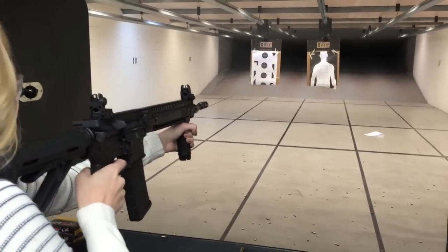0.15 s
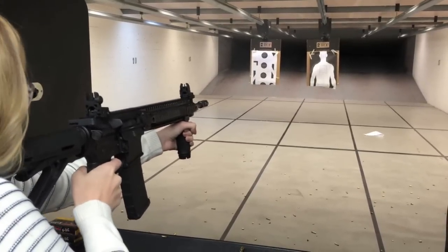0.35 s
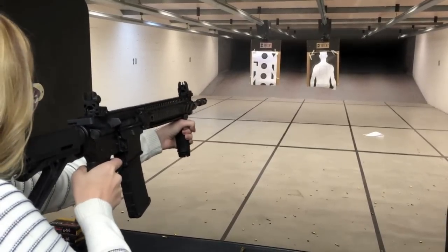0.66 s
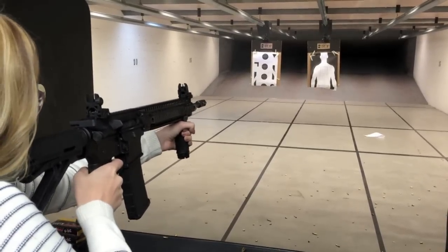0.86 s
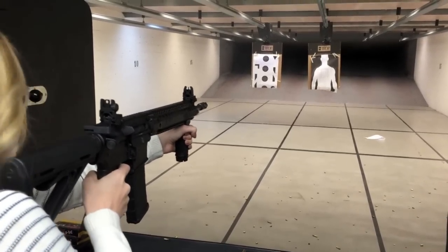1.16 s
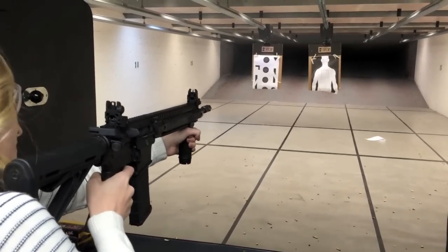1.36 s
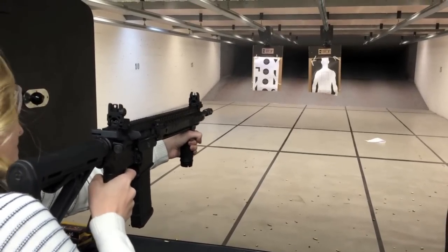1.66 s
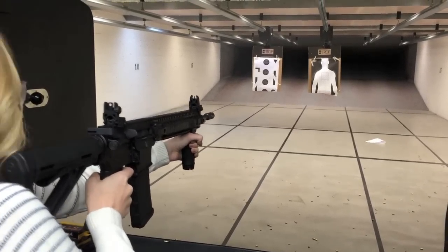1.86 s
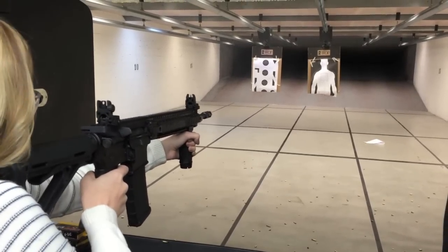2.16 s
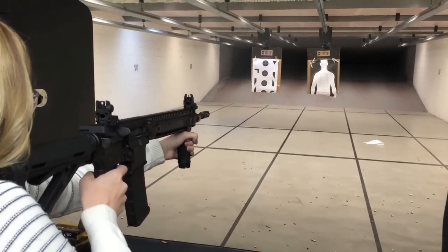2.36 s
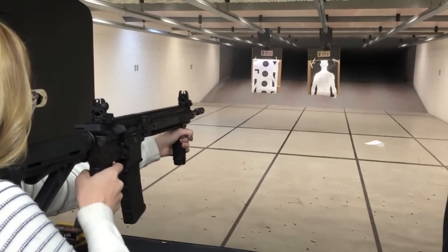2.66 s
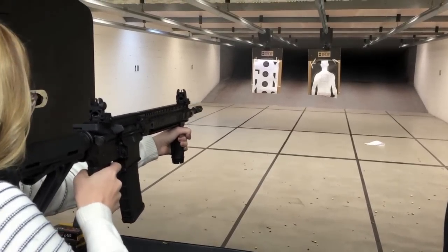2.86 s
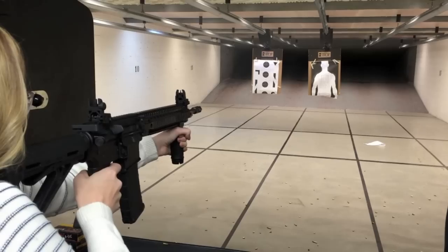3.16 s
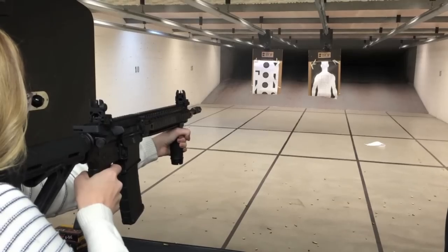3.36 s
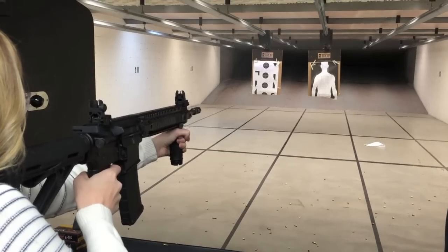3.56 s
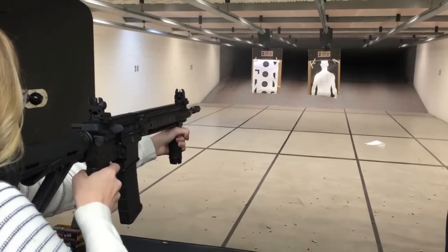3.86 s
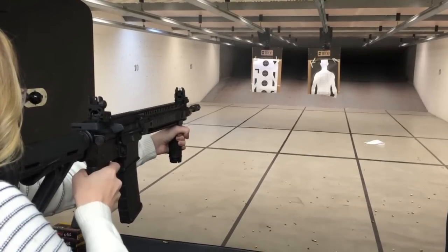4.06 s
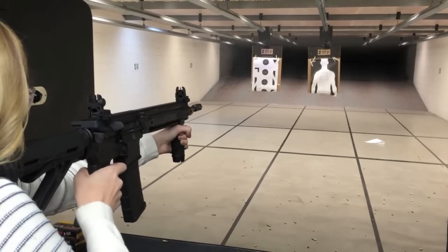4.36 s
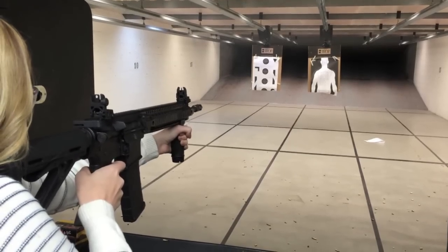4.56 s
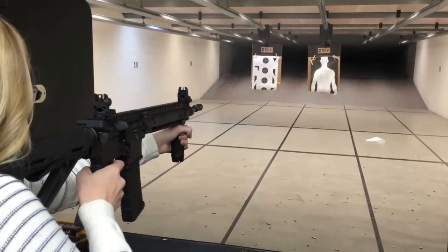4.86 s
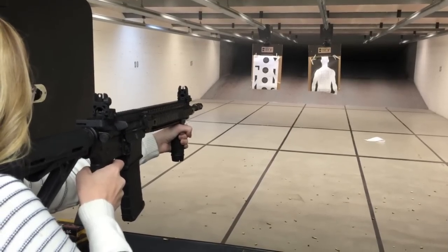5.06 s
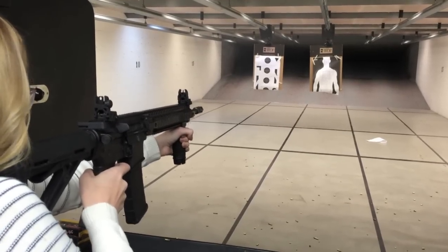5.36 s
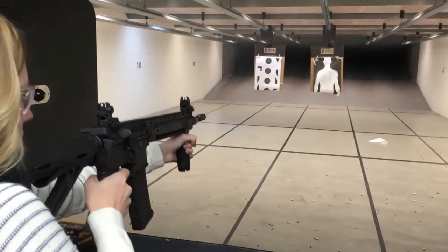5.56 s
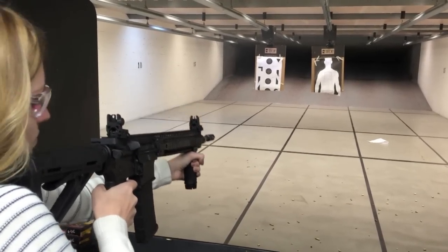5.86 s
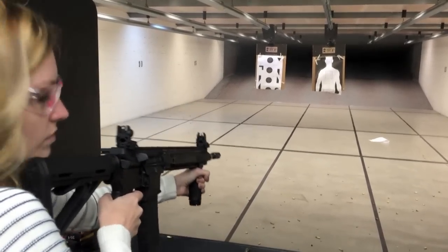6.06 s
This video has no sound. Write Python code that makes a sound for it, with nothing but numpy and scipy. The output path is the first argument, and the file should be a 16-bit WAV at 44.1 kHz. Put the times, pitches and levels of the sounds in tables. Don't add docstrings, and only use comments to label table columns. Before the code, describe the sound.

Indoor shooting range, microphone near the rifle. Low throbbing ducts and smooth vent hiss run throughout. One loud shot comes almost at once and rolls down the hall for seconds; hard bright metal clacks break its fading tail. Another shot cracks, preceded by a tiny click, and its empty case hits the floor on its rim, rings thinly and slaps flat. A faint metal tick ends it. Peaks are limited and flattened.

```python
import sys
import numpy as np
from scipy import signal
from scipy.fft import rfft, irfft
from scipy.io import wavfile
from scipy.ndimage import uniform_filter1d, minimum_filter1d

SR = 44100
rng = np.random.default_rng(int(sys.argv[2]) if len(sys.argv) > 2 else 0)


def ratio_of_db(decibels):
    return 10 ** (np.asarray(decibels, float) / 20)


def master(y):
    cut = np.clip(np.atleast_2d(y).T, -1, 1)
    pcm = np.round(cut * 32767)
    wavfile.write(sys.argv[1], SR, pcm.astype(np.int16))


N = 273859


def evened(x):
    return x / np.sqrt(np.mean(x ** 2) + 1e-20)


def read(hz_points, values, hz):
    return np.interp(np.log(hz + 1), np.log(np.asarray(hz_points) + 1), values)


def add(mix, start_s, sound):
    at = round(start_s * SR)
    sound = sound[max(-at, 0):]
    part = mix[max(at, 0):][:len(sound)]
    part += sound[:len(part)]


def swell(t, rise_s, t60_s):
    t = np.maximum(t, 0)
    return (1 - np.exp(-t / abs(rise_s))) * ratio_of_db(-60 * t / abs(t60_s))


def below(hz, edge_hz):
    return 1 / (1 + (hz / edge_hz) ** 4)


def air(spectrum, level_db, patchy_db, wide_bins, long_frames):
    frames, hz = N // 512 + 5, np.fft.rfftfreq(2048, 1 / SR)
    real, imaginary, patches = rng.standard_normal((frames, 1025, 3)).T
    patches = uniform_filter1d(patches, round(wide_bins), 0)
    patches = evened(uniform_filter1d(patches, round(long_frames), 1))
    colour_db = read(*np.transpose(spectrum), hz)[:, None]
    z = (real + 1j * imaginary) * ratio_of_db(colour_db + patchy_db * patches)
    noise = signal.istft(z, nperseg=2048, noverlap=1536)[1][:N]
    return ratio_of_db(level_db) * evened(noise)


# pitch_hz, level_db (per Hz)
DUCT_RUMBLE = [(18, -44), (30, -7), (43, -4), (65, 1.5), (81, 3), (102, -1), (157, -2), (172, -10),
               (214, -15), (240, -15.5), (310, -46), (530, -120)]
# pitch_hz, level_db (per Hz)
VENT_HISS = [(120, -33), (200, -15), (268, -3), (371, -6), (430, -2.5), (497, -9), (702, -8), (992, -12),
             (1380, -8.5), (1510, -7.5), (1650, -3.5), (2210, -12), (3420, -6.5), (13400, -26.5),
             (15500, -31)]


def ventilation():
    rumble = air(DUCT_RUMBLE, level_db=-39.5, patchy_db=2.9, wide_bins=3, long_frames=5)
    hiss = air(VENT_HISS, level_db=-44.5, patchy_db=1.2, wide_bins=30, long_frames=4)
    return rumble + hiss


def knocks(events, modes, crack_db, booth_db):
    t, out = np.arange(SR // 5) / SR, np.zeros(N)
    body = np.zeros(len(t))
    for k, (hz, db, t60_s) in enumerate(modes):
        body += (-1) ** k * ratio_of_db(db - 60 * t / t60_s) * np.sin(2 * np.pi * hz * t)
    body /= np.linalg.norm(body)
    booth = signal.lfilter([1], [1, -.5], rng.standard_normal(len(t))) * swell(t - .003, .003, .055)
    booth /= np.linalg.norm(booth)
    for start_s, level_db, contact_s in events:
        touch = np.sin(np.pi * np.clip(t[:700] / contact_s, 0, 1) ** .65)
        rub, crack = rng.standard_normal((2, 700)) * touch
        rub[0] = crack[0] = 1
        ring = signal.fftconvolve(rub, body)[:len(t)]
        add(ring, 0, ratio_of_db(crack_db) * signal.lfilter([1], [1, -.35], crack))
        ring = signal.lfilter(*signal.butter(2, 520, "high", fs=SR), ring)
        ring /= np.sqrt(np.mean(ring[:max(round(contact_s * SR), 90)] ** 2))
        tail = signal.fftconvolve(ring, booth)[:len(t)]
        add(out, start_s, ratio_of_db(level_db) * (ring + ratio_of_db(booth_db) * tail))
    return out


# start_s, level_db (rms), contact_s
TICKS = [
    (4.399, -47, .003),
    (5.685, -39, .007),
]
# pitch_hz, level_db, t60_s
TICK_RING = [(4900, -3, .008), (7700, 0, .008), (9100, 0, .008), (12500, -2, .006), (14800, -3, .006)]


def ticks():
    return knocks(TICKS, TICK_RING, crack_db=-1, booth_db=-9)


# start_s, length_s, pitch_hz, level_db
BRASS_PINGS = [(4.958, .089, 7280, -37), (4.958, .078, 13280, -46), (4.958, .055, 14580, -56),
               (4.596, .07, 12800, -56), (4.72, .12, 12850, -58), (4.72, .1, 15100, -61),
               (2.297, .06, 7300, -58)]


def brass_pings():
    t60_s, tumble_hz, tumble_depth = .4, 55, .7
    out = np.zeros(N)
    for (start_s, length_s, hz, db), (speed, phase) in zip(BRASS_PINGS, rng.random((len(BRASS_PINGS), 2))):
        t = np.arange(round(length_s * SR)) / SR
        turns = tumble_hz * (.7 + .6 * speed) * t + phase + .3 * np.sin(40 * t)
        tumble = 1 + tumble_depth * np.cos(2 * np.pi * turns)
        tone = ratio_of_db(db - 60 * t / t60_s) * np.sin(2 * np.pi * hz * t)
        add(out, start_s, tone * tumble * signal.windows.tukey(len(t), .1))
    return out


# start_s, level_db (rms), contact_s
RIM_BOUNCES = [
    (4.9568, -18, .007),
    (4.966, -37, .008),
]
# pitch_hz, level_db, t60_s
RIM_RING = [(1700, 3, .007), (2480, 4, .008), (3900, -4, .004), (5200, -14, .004), (6160, -9, .004)]
# start_s, level_db (rms), contact_s
FLAT_BOUNCES = [
    (5.0465, -26, .002),
    (5.0486, -7, .00002),
    (5.0495, -24, .005),
    (5.057, -29, .004),
    (5.064, -31, .004),
    (5.416, -42, .004),
]
# pitch_hz, level_db, t60_s
FLAT_RING = [(1150, -4, .012), (1970, 0, .016), (3500, -10, .007), (4200, -8, .007), (6300, -19, .004)]


def brass_bounces():
    rim = knocks(RIM_BOUNCES, RIM_RING, crack_db=-14, booth_db=-9)
    return rim + knocks(FLAT_BOUNCES, FLAT_RING, crack_db=-30, booth_db=-19)


# start_s, level_db (rms), contact_s
ACTION_CLACKS = [
    (2.9955, -16, .0022),
    (2.998, -25, .002),
    (3.0018, -11.5, .009),
    (3.0254, -10.5, .005),
    (3.0305, -19, .009),
    (3.128, -46, .015),
    (3.148, -46, .015),
]
# pitch_hz, level_db, t60_s
ACTION_RING = [(2150, 0, .007), (3450, -2, .004), (4800, -1, .004), (6400, 3, .006), (8900, 0, .005),
               (12500, -3, .004)]


def action():
    return knocks(ACTION_CLACKS, ACTION_RING, crack_db=1, booth_db=-11)


# start_s, level_db (rms), contact_s
HAMMER_FALLS = [
    (.372, -42, .012),
    (.3825, -27, .007),
    (4.010, -42, .012),
    (4.021, -33, .007),
]
# pitch_hz, level_db, t60_s
HAMMER_RING = [(800, 0, .012), (2900, -6, .015)]


def hammer():
    return knocks(HAMMER_FALLS, HAMMER_RING, crack_db=-11, booth_db=-8)


def ring_time(hz, t60_s):
    walls_s = t60_s * (1 + 0.13 * below(hz, 185))
    soaked = (hz / 8400) ** 1.87
    return 1 / (1 / walls_s + soaked)


# pitch_hz, level_db
NEAR_BURST = [(65, -3), (166, -5), (232, 0), (417, -30), (1000, 3), (1700, 6.5), (3200, 9.5), (8000, 8)]
# pitch_hz, level_db
MAIN_TAIL = [(40, -13), (65, 3), (135, 9), (232, 2.5), (1000, 14.5), (1630, 3.5), (3300, 4), (13200, 1)]
# pitch_hz, level_db
LATE_TAIL = [(57, -22.5), (118, -9), (235, -29.5), (488, -15.5), (1000, -16), (1600, -22.5), (3020, -23),
             (5000, -68)]
# delay_s, level_db, rise_s, t60_s
THROWN_BACK = [
    (.008, 6, 0.0043, 0.17),
    (.048, -13, .003, 0.047),
    (.114, 5, 0.021, .25),
    (.255, -13, .02, .4),
]


def hall(size, count):
    t, hz = np.arange(size) / SR, np.fft.rfftfreq(size, 1 / SR)
    z = rfft(rng.standard_normal((count, size))) / np.sqrt(hz + 10)
    centres = np.geomspace(35, 15000, num=30)
    spacing = np.log(centres[1] / centres[0])
    slaps = sum(ratio_of_db(db) * swell(t - s, rise_s, t60_s) for s, db, rise_s, t60_s in THROWN_BACK)
    out = np.zeros((count, size))
    for f in centres:
        burst_db, main_db, late_db = (read(*np.transpose(table), f)
                                      for table in (NEAR_BURST, MAIN_TAIL, LATE_TAIL))
        rise_s = 0.014 + 0.99 * below(f, 160) ** 2 + 0.066 * (1 - below(f, 2250))
        near = swell(t, .0004, ring_time(f, 0.29)) * ratio_of_db(1.5)
        far = slaps * ratio_of_db(-.0058 * f * t) * f / (f + 700)
        burst = ratio_of_db(burst_db) * below(f, 9700) ** .5 * np.hypot(near, far)
        main = ratio_of_db(main_db) * swell(t, rise_s, ring_time(f, 1.13))
        late = ratio_of_db(late_db) * swell(t, rise_s, ring_time(f, 3.11))
        share = np.interp(np.log(hz + 1), np.log(f + 1) + spacing * np.arange(-1, 2), [0, 1, 0])
        band = evened(irfft(z * np.sqrt(share), size))
        out += band * np.sqrt((burst ** 2 + main ** 2 + late ** 2) / 3)
    return out


SHOT_STARTS = [
    -1.4,
    .3945,
    4.0338,
]
SHOT_LEVELS = [
    0.43,
    1.5,
    0.11,
]


def shots():
    size, blast_db = 160000, 9
    t, out = np.arange(size) / SR, np.zeros(N)
    shared, *own = hall(size, count=4)
    u = t[:600] / .0003
    blast = -ratio_of_db(blast_db) * (1 - u) * np.exp(-u)
    alike = .9 * np.exp(-t / 3)
    for start_s, level_db, different in zip(SHOT_STARTS, SHOT_LEVELS, own):
        sound = alike * shared + np.sqrt(1 - alike ** 2) * different
        add(sound, 0, blast)
        add(out, start_s, ratio_of_db(level_db) * sound)
    return out


def scene():
    brass = brass_bounces() + brass_pings()
    metal = ticks() + action() + hammer()
    return (ventilation() + brass + metal + shots())[None]


def slow_duck(x, start_db, depth_db, fall_s, rise_s):
    power_db = 10 * np.log10(uniform_filter1d(x ** 2, size=200)[::64] + 1e-12)
    duck, ducks = 0, []
    for want in np.clip(power_db - start_db, 0, depth_db):
        pace_s = fall_s if want > duck else rise_s
        duck += (want - duck) * min(64 / SR / pace_s, 1)
        ducks.append(duck)
    return np.interp(np.arange(N) / 64, np.arange(len(ducks)), ducks)


def limiter(x, top_db, release_db_per_s):
    peak_db = 20 * np.log10(-minimum_filter1d(-abs(x), size=161) + 1e-9)
    fall = np.arange(N) * release_db_per_s / SR
    held_db = np.maximum.accumulate(peak_db + fall) - fall
    over_db = np.maximum(held_db - top_db, 0)
    return x / ratio_of_db(uniform_filter1d(over_db, size=80))


def band_limit(x):
    return signal.sosfilt(signal.butter(12, 16030, fs=SR, output="sos"), x)


def record(dry):
    x = dry[0] / ratio_of_db(slow_duck(dry[0], start_db=-16.5, depth_db=10.07, fall_s=.018, rise_s=0.27))
    x = limiter(x, top_db=-3, release_db_per_s=185)
    x = signal.lfilter(*signal.butter(2, 36, "high", fs=SR), x)
    treble_edge = signal.firwin(255, 15300, window=("kaiser", 9), fs=SR)
    mix = signal.oaconvolve(x, treble_edge, "same")[None]
    return band_limit(mix)


dry = scene()
out = record(dry)
master(out)
```